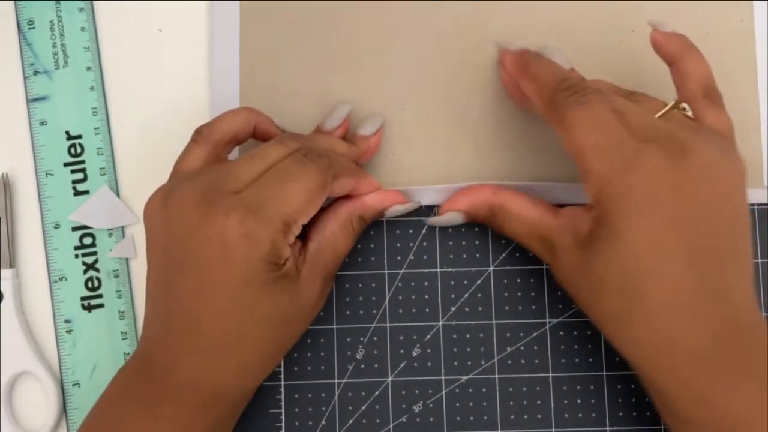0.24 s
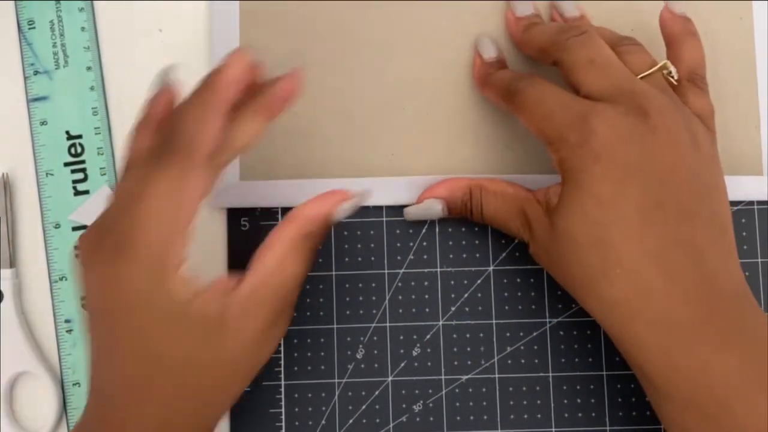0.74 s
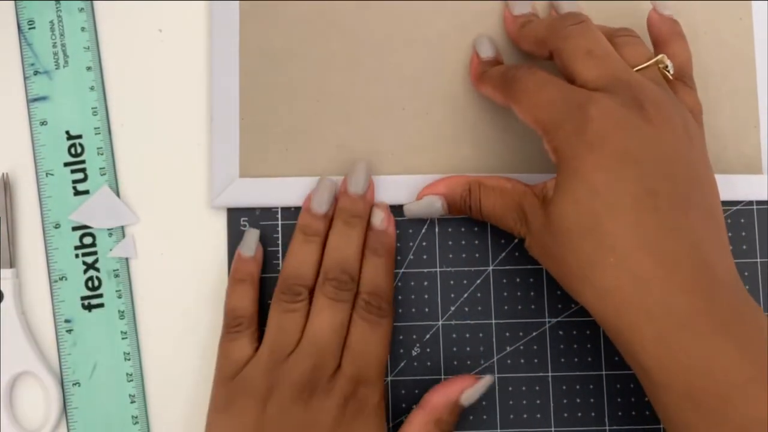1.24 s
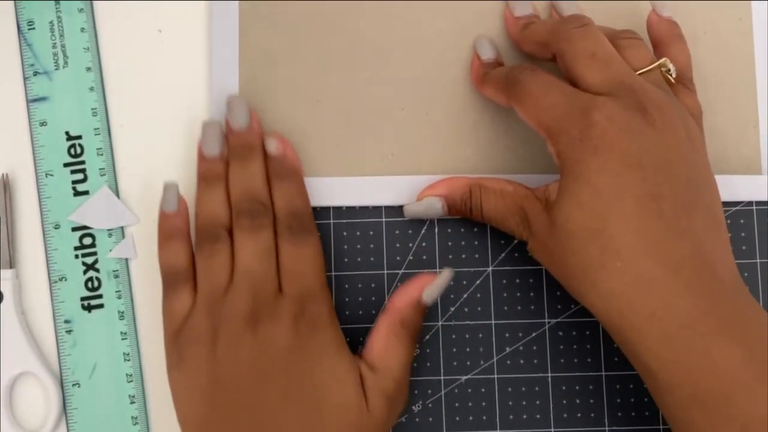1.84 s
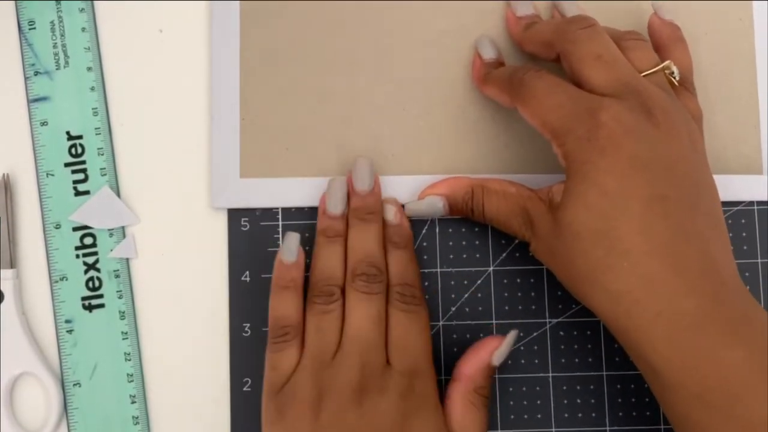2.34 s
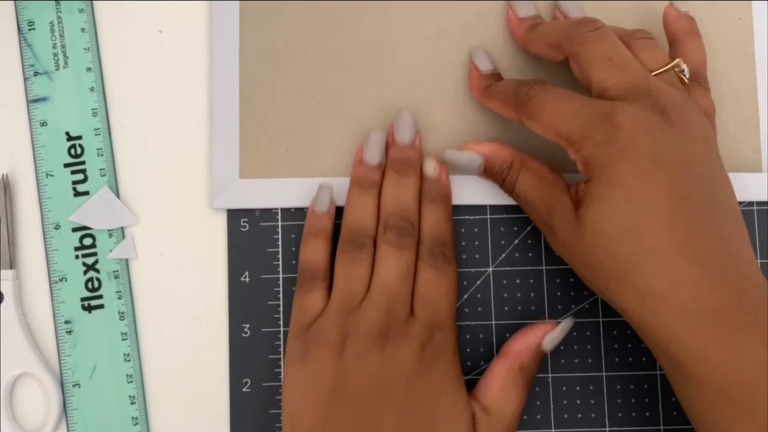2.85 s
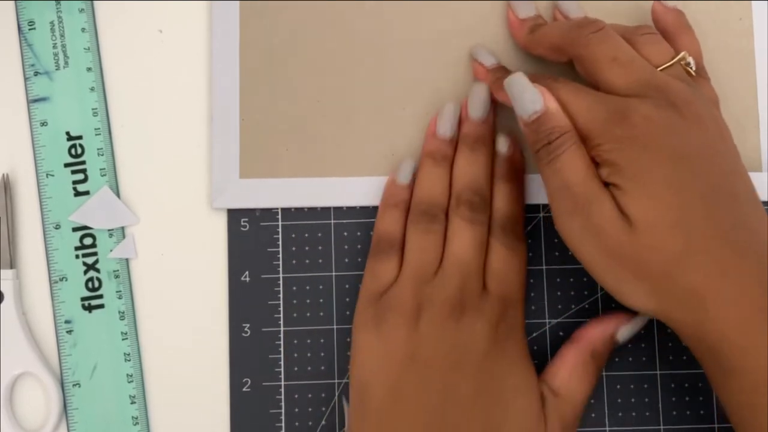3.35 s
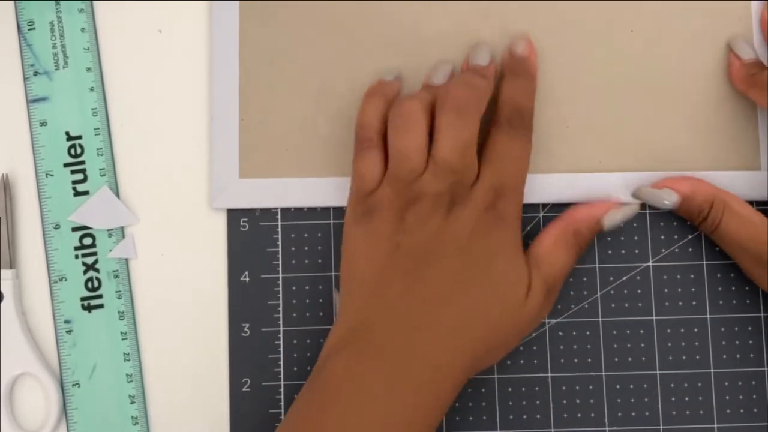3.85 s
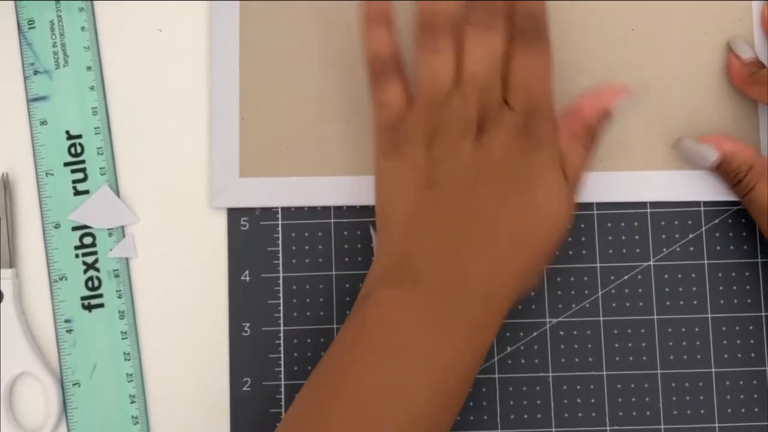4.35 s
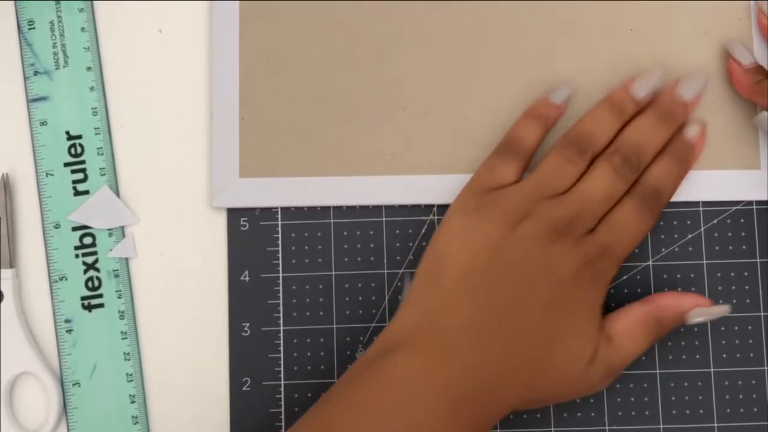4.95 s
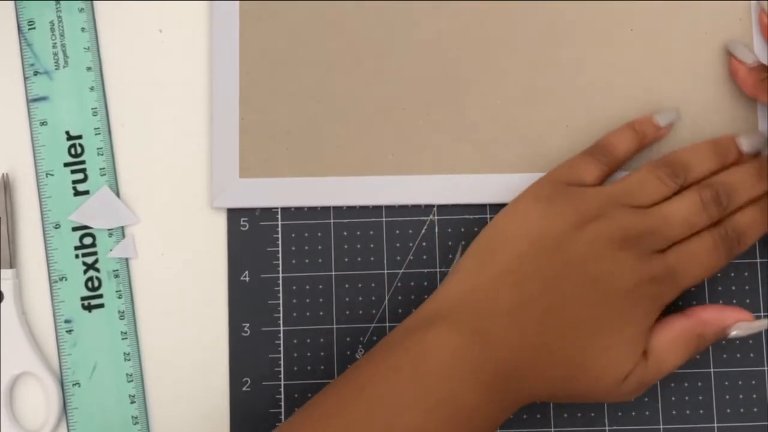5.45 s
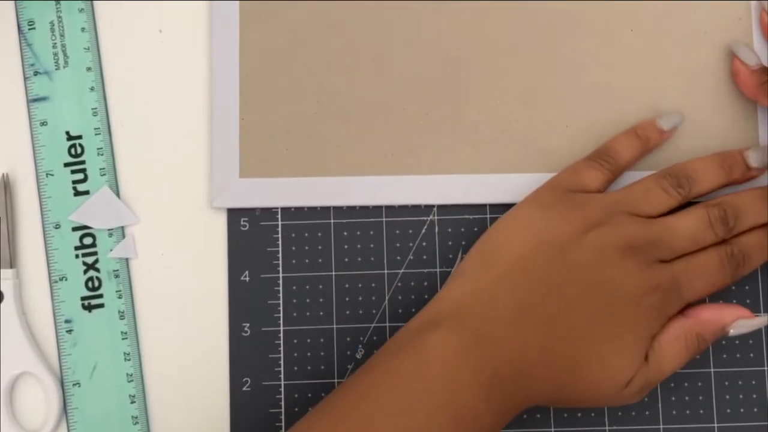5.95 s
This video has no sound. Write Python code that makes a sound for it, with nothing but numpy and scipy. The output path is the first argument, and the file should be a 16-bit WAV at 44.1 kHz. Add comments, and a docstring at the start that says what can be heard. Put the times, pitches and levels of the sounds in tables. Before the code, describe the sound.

A close microphone in a small, quiet room with faint low rumble picks up hands smoothing sticky paper over stiff board. From 0 to 0.6 s there are soft skin hisses, nail ticks, and a short scrape near 0.3 s. At 0.66 s one nail slips off another with a bright, sharp snap, followed by near quiet. A fuller papery swish with a drag comes at 1.3 s, then quick short rubs from 1.6 to 2.4 s. Around 2.5 to 2.8 s, coarse scrapes, stuttering nail ticks and dull low bumps cluster together; a deeper bump lands at 3.1 s. Smooth rubbing and a very deep, faint sway follow near 3.6 s. Clicks and a raspy stutter fill 3.9 to 4.35 s. A low, chattering rub comes at 4.8 s, quieter sliding next, a stuttering scratch at 5.3 to 5.5 s, then taps near 5.9 s and a final hiss just after 6 s.

```python
"""Hands smooth sticker paper over the edge of a chipboard cover on a cutting mat, close to the microphone.
From the start skin hisses over the paper as filtered slips, and nails drag and tick, ringing the board's modes.
At 0.66 s two nails snap past each other in a noisy crack; from 1.7 to 3.9 s fingers land in damped low swings.
From 2.5 s nails also stutter in runs of ticks, and a deep sway comes at 3.6 s; short skids chatter here and there.
A small room of scattered echoes and a low rumble of shaped noise surround it all."""
import sys
import numpy as np
from scipy import signal
from scipy.fft import rfft, irfft
from scipy.io import wavfile
from scipy.ndimage import uniform_filter1d

SR = 44100
rng = np.random.default_rng(int(sys.argv[2]) if len(sys.argv) > 2 else 0)


def waveform_to_disk(signal):
    """Save audio, clipped to [-1, 1], as 16-bit WAV at the path in sys.argv[1]."""
    frames = np.transpose(np.atleast_2d(signal))
    scaled = np.clip(frames, -1, 1) * 32767
    samples = np.round(scaled).astype(np.int16)
    wavfile.write(sys.argv[1], SR, samples)


N = 274037

# resonances of the board: (frequency [Hz], relative level [dB], t60 [s])
BOARD_RESONANCES = [(229.6, -6, 0.27), (335.4, -6, 0.22), (366.6, 4.5, 0.07), (430, -8, 0.15),
                    (517.5, -3.5, 0.15), (632, -24, 0.041), (715, 2.5, 0.042), (900, 0, 0.037),
                    (912, -2, 0.031), (1077, -7.5, 0.07), (1246, -7, 0.079), (1326, -13.5, 0.13),
                    (1600, -1.5, 0.021), (1852, -1.5, 0.023), (2520, 1.5, 0.013), (2710, -13.5, 0.0083),
                    (3033, -5, 0.014)]
# spectrum of nails scraping the board: (frequency [Hz], relative density [dB per Hz])
SCRAPE_SPECTRUM = [(60, -21.5), (150, 0), (240, 5.5), (400, 2.5), (600, 2.5), (800, 0), (1250, -3.5),
                   (1800, -12), (2600, -13), (3500, -23), (6000, -27), (15000, -43)]


def skin(gain_db=2.0, flutter_db=1.0, patch_db=2.25):
    """Fine friction hiss whose colour drifts as the patch of touching skin changes."""
    # hiss of skin on paper: (frequency [Hz], relative density [dB per Hz])
    skin_spectrum = [(100, -29), (300, 2), (700, -1.5), (1300, 1), (2000, -2.5), (2600, 5.5), (3200, 3),
                     (4200, -0.5), (5800, 1.5), (7500, -2), (10500, -2), (13000, -3.5), (15500, -8),
                     (16500, -21)]
    # lightness of the touch, positive is brighter: (time [s], tilt [dB per factor e in (Hz + 2000)])
    sheen = [(0.1, -3.5), (1.45, 0), (2.2, 1), (2.9, -1), (3.85, 0), (4.7, -1.5), (5.6, -4.5), (6.15, 3)]
    slips = grains(20000, 1.0) * amp(flutter_db * wander(60))
    hiss = colour(slips, skin_spectrum)
    hz, t, bins = signal.stft(hiss, SR, nperseg=512)
    # random gains, smoothed over frequency and then over time
    patches = uniform_filter1d(rng.standard_normal(bins.shape), size=9, axis=0)
    patches = unit(uniform_filter1d(patches, size=24, axis=1))
    # the tilt pivots at 8 kHz
    tilt_db = np.interp(t, *np.transpose(sheen)) * np.log((hz[:, None] + 2000) / 10000)
    hiss = signal.istft(bins * amp(patch_db * patches + tilt_db), SR, nperseg=512)[1][:N]
    return amp(gain_db) * strokes() * unit(hiss)


def strokes(speed_law=1.41, rest_db=-76):
    """Strength of the skin's friction: a power of hand speed, which rises and falls in one arch per stroke."""
    # skin over paper, before the hiss gain: (start [s], speeding up [s], slowing down [s], level [dB])
    stroke_rows = [(0, 0.071, 0.055, -55.5), (.08, .19, .1, -54.5), (0.331, 0.081, 0.041, -58),
                   (.96, 0.096, 0.11, -61), (1.03, 0.16, .19, -56.5), (1.278, 0.15, 0.13, -47),
                   (1.53, 0.068, 0.053, -53.5), (1.625, 0.059, 0.019, -50), (1.705, 0.045, .08, -54),
                   (1.73, 0.081, .11, -51), (1.915, 0.045, 0.036, -55), (2.016, 0.017, 0.018, -53.5),
                   (2.055, 0.051, 0.14, -50.5), (2.228, 0.036, 0.019, -58), (2.31, 0.013, 0.031, -54.5),
                   (2.372, 0.012, 0.051, -58), (2.58, 0.064, 0.037, -58.5), (2.67, 0.056, 0.31, -55.5),
                   (2.79, 0.12, 0.096, -52), (2.99, 0.025, 0.019, -59), (3.13, 0.059, 0.2, -55),
                   (3.209, 0.19, .105, -52.5), (3.465, 0.041, .045, -61), (3.619, 0.21, 0.15, -53.5),
                   (3.97, 0.021, .04, -59), (4.07, .09, 0.15, -53.5), (4.33, 0.068, 0.045, -64),
                   (4.57, 0.11, 0.18, -61.5), (4.76, 0.15, 0.14, -52), (4.961, 0.046, 0.25, -63.5),
                   (5.36, 0.11, 0.055, -58), (5.54, 0.022, 0.02, -63.5), (5.603, 0.031, .042, -60),
                   (6.026, 0.052, 0.05, -49.5), (6.071, 0.11, .15, -50)]
    t = np.arange(N) / SR
    power = np.full(N, amp(rest_db) ** 2)  # hands that lie almost still
    for start, rise, fall, db in stroke_rows:
        stroke_t = t[:int((rise + fall) * SR)]
        arch = np.interp(stroke_t, [0, rise, rise + fall], [0, .5, 1])
        speed = abs(np.sin(np.pi * arch))
        add(power, start, (amp(db) * speed ** speed_law) ** 2)
    return np.sqrt(power)


def drag(scrape_db=-1.5, board_db=-2.5, judder_db=3.0):
    """Coarse, juddering slips under nails and pressed fingertips, part of which ring the board."""
    # drags, before the scrape and board gains: (hardest moment [s], pressing [s], easing [s], level [dB])
    drag_rows = [(.01, 0.027, .03, -47.5), (.275, 0.054, 0.032, -41), (.31, .025, 0.082, -42.5),
                 (1.275, 0.062, 0.38, -39.5), (1.77, 0.11, 0.12, -53), (1.826, 0.025, .1, -41.5),
                 (2.155, .18, 0.21, -49.5), (2.47, 0.082, 0.072, -40), (2.6, 0.021, .07, -36.5),
                 (2.78, 0.12, 0.18, -39), (3.192, 0.034, 0.38, -41.5), (3.867, 0.24, 0.092, -49),
                 (3.979, 0.041, 0.14, -47), (4.101, 0.013, 0.18, -40.5), (4.19, 0.038, 0.044, -34.5),
                 (4.245, 0.062, 0.089, -37), (4.646, 0.024, 0.073, -51), (4.79, .1, 0.11, -51),
                 (4.905, 0.15, 0.11, -46.5), (5.301, 0.11, .1, -46), (5.39, 0.063, 0.12, -37.5),
                 (5.915, 0.041, 0.085, -50)]
    slips = grains(2500, 3.0) * amp(judder_db * wander(90))
    strength = np.sqrt(sum(press(*row) ** 2 for row in drag_rows))
    push = unit(slips) * strength
    # both paths are scaled to an impulse response of unit energy
    scrape_response = colour(signal.unit_impulse(4096), SCRAPE_SPECTRUM)
    scrape = colour(push, SCRAPE_SPECTRUM) / np.linalg.norm(scrape_response)
    board = ring(BOARD_RESONANCES, 1.0)
    board_sound = signal.fftconvolve(push, board / np.linalg.norm(board))[:N]
    return amp(scrape_db) * scrape + amp(board_db) * board_sound


def press(s, press_s, ease_s, db, swell_db=22):
    """Strength of one drag: it swells by swell_db per press_s up to time s, then sinks as much per ease_s."""
    t = np.arange(N) / SR - s
    distance = np.maximum(-t / press_s, t / ease_s)
    return amp(db - swell_db * np.minimum(distance, 10))


def ticks(ring_db=-1, crackle_db=-13, rattle_db=-5, rattle_t60=0.049, rise_s=0.00087, size=8000):
    """Each nail contact is a sharp click with a trace of crackle, then the knock of the board against the mat."""
    # nails tapping or catching on the paper edge: (time [s], click level [dB], knock level before ring_db [dB])
    tick_rows = [(0.0504, -35, -28.5), (0.0924, -36, -49), (0.2967, -59, -36), (0.4507, -43, -45.5),
                 (0.4698, -43, -43), (0.5162, -45, -48), (0.5426, -48, -56), (0.6082, -50, -49.5),
                 (0.6226, -41.5, -60), (1.2523, -41, -41), (1.7267, -65, -46), (2.0226, -47.5, -45),
                 (3.134, -52, -47), (3.1808, -44.5, -37), (3.943, -49, -40.5), (3.9741, -35, -31),
                 (4.088, -41, -35.5), (4.1153, -45, -35.5), (4.271, -47.5, -35.5), (4.328, -37, -35),
                 (5.347, -42, -39.5), (5.7844, -43.5, -37.5), (5.9006, -37, -31.5), (5.9296, -43, -39),
                 (6.0348, -45, -41.5)]
    # spectrum of the click: (frequency [Hz], relative density [dB per Hz])
    tick_spectrum = [(200, 18), (900, -2), (1800, 6), (2700, 11), (4000, 2.5), (7000, -3), (10000, -2),
                     (16000, -13.5)]
    out, t = np.zeros(N), np.arange(size) / SR
    onset = 1 - np.exp(-t / rise_s)
    for s, click_db, knock_db in [*tick_rows, *catches()]:
        crackle_noise, rattle_noise = rng.standard_normal((2, size))
        crackle = crackle_noise * amp(crackle_db - 60 * t / .007)
        click = colour(signal.unit_impulse(size) + crackle, tick_spectrum)
        rattle = colour(rattle_noise * amp(-60 * t / rattle_t60), SCRAPE_SPECTRUM)
        board = ring(BOARD_RESONANCES, 4.8)
        # levels refer to the first 9 ms of the knock and 2 ms of the click
        knock = board / board[:400].std() + amp(rattle_db) * rattle / rattle[:400].std()
        click = click / click[:88].std()
        add(out, s, amp(click_db) * click + amp(knock_db + ring_db) * knock * onset)
    return out


def catches(fade_db=1.86, scatter_db=1.5, jitter_s=.0006):
    """A nail stuttering over paper catches in nearly even ticks, each fade_db weaker apart from random scatter."""
    # runs: (start [s], catches [count], gap [s], first click level [dB], first knock level before ring_db [dB])
    stutters = [(2.4579, 3, 0.014, -37.5, -30), (2.5813, 2, .0097, -41.5, -33),
                (2.7224, 2, .0224, -40, -38), (2.7595, 6, .0129, -39.5, -30.5),
                (4.184, 6, .013, -45.5, -37), (5.274, 3, .0115, -35.5, -36),
                (5.3803, 6, 0.0094, -36, -37.5)]
    rows = []
    for start, count, gap, click_db, knock_db in stutters:
        for k in range(round(count)):
            late, click, knock = rng.standard_normal(3)
            s = start + k * gap + jitter_s * late * (k > 0)  # the first catch is on time
            rows.append((s,
                         click_db - k * fade_db + scatter_db * click,
                         knock_db - k * fade_db + scatter_db * knock))
    return rows


def snap(gain_db=-7, crack_db=-4, knock_db=-39, tail_db=-43, size=16000):
    """A nail scrapes, slips off with a crack that rings both nails and flicks the board, and dies away in the room."""
    # quick slips as the nail lets go: (time [s], relative level [dB])
    slips = [(0.6557, 0), (0.65639, -2), (0.6574, -4)]
    # spectrum of nail on nail: (frequency [Hz], relative density [dB per Hz])
    nail_spectrum = [(200, -4.5), (1000, -9), (1600, -7.5), (2400, -8.5), (3100, -1), (3600, -3),
                     (4500, -6.5), (6800, -12.5), (8800, -16.5), (9800, -12.5), (12500, -15), (16000, -29)]
    first_s = slips[0][0]
    # one nail slides along the other, harder and harder until it slips off
    slide = press(first_s, press_s=0.02, ease_s=0.065, db=-32.5)
    out = slide * unit(colour(grains(8000, 2.0), nail_spectrum))
    t = np.arange(size) / SR
    clack = nail(cycles=30, size=size)
    for s, db in slips:
        crack = colour(rng.standard_normal(size) * amp(-60 * t / .016), nail_spectrum)
        add(out, s, amp(db + gain_db) * (clack + amp(crack_db) * crack))
    diffuse = fade(unit(colour(rng.standard_normal(size), nail_spectrum)))
    knock = ring(BOARD_RESONANCES, 0.94, size=size)
    add(out, first_s, amp(tail_db) * diffuse + amp(knock_db) * knock)
    return out


def nail(cycles, size):
    """Heavily damped nail modes of alternating sign, each falling by 60 dB in the same number of cycles."""
    # what the nails ring with: (frequency [Hz], relative level [dB])
    nail_resonances = [(1044, -22.5), (2400, -4), (3120, -1.5), (4030, -7.5), (4480, -5), (5500, -6),
                       (7700, -12), (9650, -3), (10900, -6.5), (14200, -20)]
    out, t = np.zeros(size), np.arange(size) / SR
    for k, (hz, db) in enumerate(nail_resonances):
        decay = amp(db - 60 * t * hz / cycles)
        out += (-1) ** k * decay * np.sin(2 * np.pi * hz * t)
    return out


def thuds(gain_db=3, t60=0.15, rise_s=0.0044, size=12000):
    """Soft flesh pushes the board and table: each landing is a damped swing at one pitch."""
    # fingers and the heel of the hand landing: (time [s], level before gain_db [dB], pitch [Hz])
    landings = [(1.66, -32, 112.5), (2.019, -32.5, 93.4), (2.46, -30, 111.8), (2.585, -28, 437),
                (2.719, -26.5, 68.4), (2.771, -28.5, 91.5), (3.131, -25, 62), (3.137, -30.5, 136),
                (3.945, -32.5, 118)]
    out, t = np.zeros(N), np.arange(size) / SR
    onset = 1 - np.exp(-t / rise_s)
    for s, db, hz in landings:
        decay = amp(db + gain_db - 60 * t / t60)
        add(out, s, decay * onset * np.sin(2 * np.pi * hz * t))
    return out


def skids(sag=0.27, jitter=.35, overtone_db=-9):
    """Uneven stick-slip cycles that slow down as the finger stops."""
    # fingertip or nail chattering as it skids: (time [s], length [s], level [dB], middle pitch [Hz])
    skid_rows = [(0.269, 0.01, -41, 630), (1.722, 0.017, -50, 757), (1.817, 0.031, -40.5, 746),
                 (2.638, 0.013, -49, 2410), (4.18, 0.0188, -42, 2680), (4.781, 0.057, -39, 245.7),
                 (5.9, 0.018, -38.5, 775)]
    out = np.zeros(N)
    for s, length, db, hz in skid_rows:
        u = np.linspace(0, 1, int(length * SR))  # progress through the skid
        uneven = unit(uniform_filter1d(rng.standard_normal(N // 100), size=30))[:len(u)]
        pitch = hz * (1 + sag * (.5 - u) + jitter * uneven)
        phase = 2 * np.pi * np.cumsum(pitch) / SR
        chatter = unit(np.sin(phase) + amp(overtone_db) * np.sin(2 * phase))
        add(out, s, amp(db) * chatter * signal.windows.tukey(len(u), .5))
    return out


def pressed(x, body_hz=450):
    """A heavy flat hand drives the low body of the board; light nails hardly do."""
    # weight of the hand, as gain on the low body: (time [s], level [dB])
    weight = [(0, -16), (0.6, -1.5), (1.28, 5), (1.6, -11), (1.83, 1), (2.55, 1.5), (3.25, -5.5), (3.9, -3),
              (4.2, -6.5), (4.79, 13.5), (5.0, -0.5), (5.4, 2), (6.21, -2)]
    body = signal.sosfiltfilt(signal.butter(2, body_hz, fs=SR, output="sos"), x)
    return x + (level(weight) - 1) * body


def room(x, first_s=0.0022, size=22050):
    """Scattered reflections from the table and walls, as sparse random echoes that die away."""
    echoes = rng.standard_normal(size) * (rng.random(size) < 4000 / SR)  # about 4000 per second
    tail = fade(echoes * (np.arange(size) > first_s * SR))
    return signal.fftconvolve(x, tail / np.linalg.norm(tail))[:N]


def fade(x):
    """Lets each band of x die away at the room's speed."""
    # ring time of the room: (frequency [Hz], t60 [s])
    room_t60 = [(200, 0.95), (1000, 0.36), (3500, 0.44), (8000, 0.4), (15000, 0.32)]
    hz, t, bins = signal.stft(x, SR, nperseg=256)
    decay = amp(-60 * t / read(room_t60, hz)[:, None])
    return signal.istft(bins * decay, SR, nperseg=256)[1][:len(x)]


def background(floor_db=-35.0, sway_db=-22, sway_hz=20, start_s=3.55, end_s=3.96):
    """Low room rumble of shaped noise, and one deep sway as the right hand lets go of the board."""
    # spectrum of the rumble: (frequency [Hz], relative level [dB])
    rumble_spectrum = [(8, 8), (26, 8.5), (42, -4), (62, -1), (85, -4.5), (120, -11.5), (160, -23),
                       (280, -21), (480, -31.5), (1000, -42), (2500, -54.5), (7000, -67), (15000, -73.5)]
    f = np.fft.rfftfreq(N, 1 / SR)
    rumble = irfft(rfft(rng.standard_normal(N)) * amp(read(rumble_spectrum, f)), N)
    out = amp(floor_db) * unit(rumble)
    t = np.arange(0, end_s - start_s, 1 / SR)
    sway = signal.windows.tukey(len(t), .6) * np.sin(2 * np.pi * sway_hz * t)
    add(out, start_s, 2 * amp(sway_db) * sway)  # peaks at twice sway_db's amplitude
    return out


def ring(modes, scatter_db, size=8000):
    """Dying modes; the place of the blow sets each one's share and sign, drawn at random."""
    hz, db, t60 = np.transpose(modes)[:, :, None]
    t = np.arange(size) / SR
    share = amp(scatter_db * rng.standard_normal(hz.shape)) * rng.choice([-1, 1], hz.shape)
    return (share * amp(db - 60 * t / t60) * np.sin(2 * np.pi * hz * t)).sum(0)


def grains(per_s, spread_db):
    """Random tiny slips of uneven size, scaled to rms 1."""
    size = amp(spread_db * np.minimum(rng.exponential(1, N), 4))
    happens = rng.random(N) < per_s / SR
    return unit(size * rng.standard_normal(N) * happens)


def wander(rate_hz):
    """Smooth random motion of rms 1: noise held below about rate_hz."""
    f = np.fft.rfftfreq(N, 1 / SR)
    return unit(irfft(rfft(rng.standard_normal(N)) / (1 + (f / rate_hz) ** 4), N))


def colour(x, spectrum, size=8192):
    """Causal minimum-phase filter with the given spectrum."""
    log_gain = np.log(amp(read(spectrum, abs(np.fft.fftfreq(size, 1 / SR)))))
    response = np.fft.ifft(np.exp(np.conj(signal.hilbert(log_gain)))).real
    return signal.fftconvolve(x, response[:size // 2])[:len(x)]


def amp(db):
    """Decibels to amplitude."""
    return 10 ** (np.asarray(db) / 20)


def unit(x):
    """Scales to rms 1."""
    return x / np.sqrt(np.mean(x ** 2) + 1e-20)


def read(points, hz):
    """Reads a table on a log-frequency axis."""
    f, value = np.transpose(points)
    return np.interp(np.log(hz + 1), np.log(f + 1), value)


def level(curve):
    """Gain at every sample from rows of (time [s], level [dB])."""
    s, db = np.transpose(curve)
    return amp(np.interp(np.arange(N) / SR, s, db))


def add(mix, s, sound):
    """Mixes a sound in at time s."""
    part = mix[max(round(s * SR), 0):][:len(sound)]
    part += sound[:len(part)]


def scene(rub_room_db=-15, tick_room_db=-11):
    """Close sounds of the hands, rubbing and taps each with a share of room, over the background."""
    rubbing = skin() + pressed(drag())
    taps = pressed(ticks()) + thuds() + skids()
    wet = room(amp(rub_room_db) * rubbing + amp(tick_room_db) * taps)
    return (rubbing + taps + snap() + wet + background())[None]


def record(dry, edge_hz=16000):
    """The recorder's band limit: a steep low-pass at edge_hz."""
    low_pass = signal.firwin(301, edge_hz, window=("kaiser", 9), fs=SR)
    return signal.oaconvolve(dry, low_pass[None], "same")


dry = scene()
out = record(dry)
waveform_to_disk(out)
```